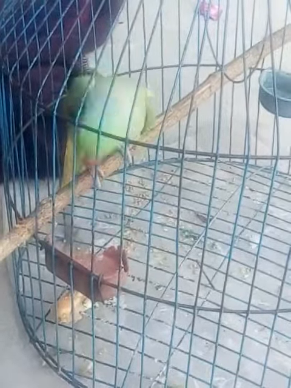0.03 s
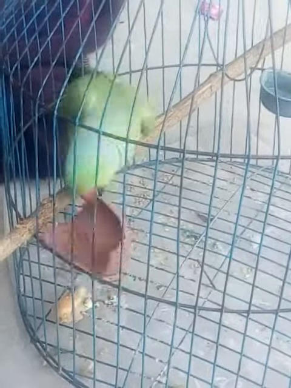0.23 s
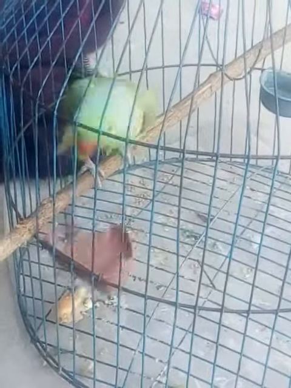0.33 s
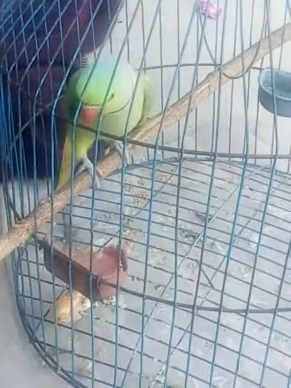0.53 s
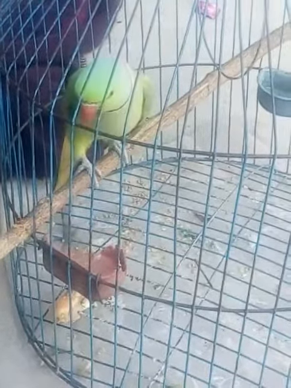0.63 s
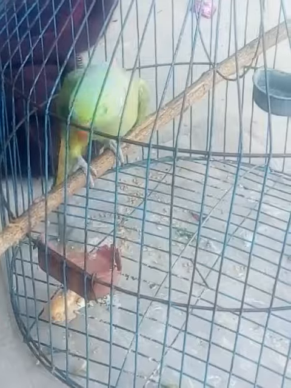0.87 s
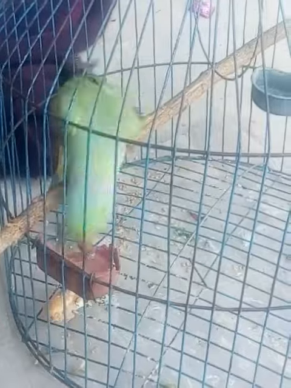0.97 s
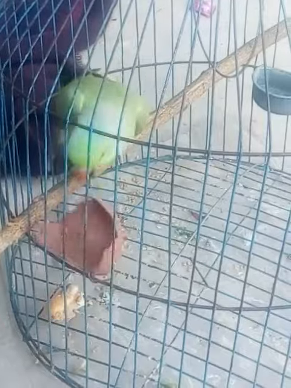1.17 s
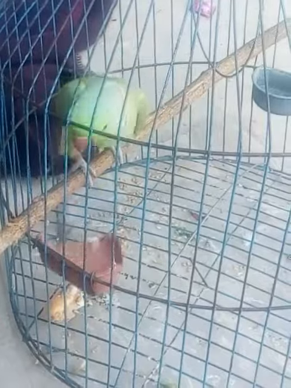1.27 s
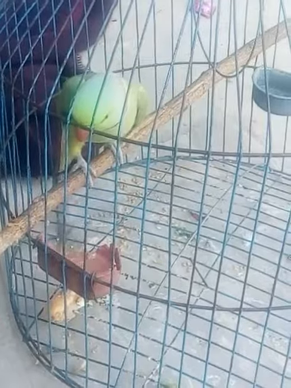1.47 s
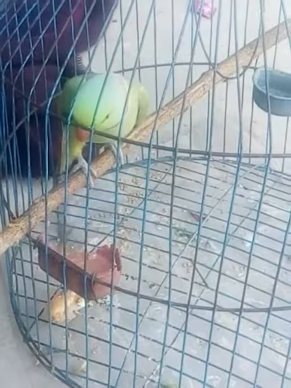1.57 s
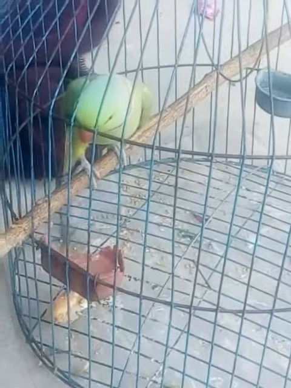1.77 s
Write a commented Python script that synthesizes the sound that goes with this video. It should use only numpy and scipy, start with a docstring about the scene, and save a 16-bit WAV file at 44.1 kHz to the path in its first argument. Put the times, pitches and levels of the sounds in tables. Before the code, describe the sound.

A parrot gives two harsh rasping squawks close by, with light plastic knocks and faint rustling

```python
"""At a cage, close to the microphones: a parrot gives two rasping squawks, lunging at a plastic tub.
Its syrinx sounds in short bursts, about 125 a second, each a rising buzz with throat rings and breath.
The knocked tub and its ticks are ringing modes; the rustle of seeds and claws is grainy noise.
Far behind: a horn and steady tones built of sines, a bird chirping as a blurred falling trill,
and a low rumble with air, which is coloured noise."""
import sys
import numpy as np
from scipy import signal
from scipy.fft import rfft, irfft
from scipy.io import wavfile

SR = 44100
rng = np.random.default_rng(int(sys.argv[2]) if len(sys.argv) > 2 else 0)


def ratio_of_db(decibels):
    """Turn decibels (scalar or array-like) into linear amplitude factors; 0 dB maps to 1."""
    return 10 ** (np.asarray(decibels, float) / 20)


def output_pcm(signal):
    """Save a mono or channel-first signal as 16-bit PCM at the path in sys.argv[1].

    Samples are clipped to [-1, 1] before scaling.
    """
    pcm = np.clip(np.atleast_2d(signal).T, -1, 1) * 32767
    wavfile.write(sys.argv[1], SR, np.round(pcm).astype(np.int16))


N = 79380   # samples, 1.8 s
EARS = np.array([[1], [-1]])   # left, right


def rms_one(x):
    """Scales a sound to an rms of 1."""
    return x / np.sqrt(np.mean(x ** 2) + 1e-20)


def in_time(rows):
    """Reads table columns at every sample; the second (dB) is silent outside the table."""
    s, db, *rest = np.transpose(rows)
    t = np.arange(N) / SR
    level_db = np.interp(t, s, db, -200, -200)
    return [level_db] + [np.interp(t, s, column) for column in rest]


def at_hz(points, hz):
    """Reads a table of (Hz, value) along a logarithmic frequency scale."""
    p = np.array(points)
    return np.interp(np.log(hz + 1), np.log(p[:, 0] + 1), p[:, 1])


def colour(x, points, share=1):
    """Filters by a share of a table of (Hz, dB)."""
    gain_db = share * at_hz(points, np.fft.rfftfreq(N, 1 / SR))
    return irfft(rfft(x) * ratio_of_db(gain_db), N)


def drift(rate_hz):
    """Slow random wandering with a spread of 1, drawn every 40 samples."""
    r = np.exp(-80 * np.pi * rate_hz / SR)
    noise = rng.standard_normal(N // 40 + 2002)
    slow = signal.lfilter([1], [1, -2 * r, r * r], noise)[2000:]
    return np.interp(np.arange(N) / 40, np.arange(len(slow)), rms_one(slow))


def squawk(rows, first_burst_s):
    """Bursts of the syrinx drive a buzz and three throat rings; breath noise passes the same gate."""
    # Breath noise colour. Each row: frequency in Hz, relative level in dB per Hz.
    throat = [(290, -44), (500, -17), (950, -2), (1290, -13), (1900, -2), (2400, -2), (3190, -4.5),
              (4400, -4.5), (5500, -11), (7130, -15.5), (8300, -35.5), (10500, -37), (15500, -47)]
    # Throat and beak resonances. Each row: frequency in Hz, gain in dB.
    beak = [(300, -18), (700, -6), (960, 1), (1300, 2.5), (2200, -6), (2850, -0.5), (3700, -7),
            (4400, -3.5), (5400, 6), (6400, -3.5), (7400, -42), (8500, 0), (12000, -12.5)]
    # Nasal ring. Each row: time in seconds, relative level in dB.
    nasal = [(.17, -8), (.228, -3.5), (.292, -4), (.33, -19), (.6, -35), (1.045, -2.5), (1.136, -4),
             (1.19, -2.5), (1.23, -40), (1.42, -53), (1.47, -11), (1.56, -9)]
    # Relative levels of the buzz partials 4 and up, in dB.
    upper_partials = [-27, -17.5, -54, -58, -49, -64, -33.5]
    rise_s, fall_s = 0.0017, 0.0014   # shape of a burst
    jitter_s, spread_db, pitch_spread = .00006, .6, .004   # chance from burst to burst
    nasal_hz = 1554
    high_ring_rise = .08   # share of its pitch that the high ring sweeps in a burst
    slip_rad, scatter_rad = 1.3, .3   # phase: slip at each burst, offset between the ears
    breath_alike = 0.21   # likeness of the breath in the two ears
    between_db, breath_db = -10, -9   # breath let through between bursts, breath against buzz

    db, rate, low_hz, low_db, hz, rise, p2, p3, high_hz, high_db = in_time(rows)
    turns = np.cumsum(rate) / SR
    turns -= turns[int(first_burst_s * SR)]
    burst = np.round(turns).astype(int)
    luck = rng.standard_normal((400, 27))[burst % 400]
    u = (turns - burst) / rate + jitter_s * luck[:, 0]   # seconds from the burst's peak
    gate = np.exp(-.5 * (u / np.where(u < 0, rise_s, fall_s)) ** 2)
    gate = gate * ratio_of_db(spread_db * luck[:, 1])

    # The membranes run on between bursts and slip a little each time.
    turn = 2 * np.pi * (1 + pitch_spread * luck[:, 2])
    slip = slip_rad * np.cumsum(rng.standard_normal((400, 4)), axis=0)[burst % 400].T

    def run_on(f):
        return 2 * np.pi * np.cumsum(f) / SR + (turn - 2 * np.pi) * f * u

    def sweep_up(f, share):
        return turn * f * share * u * u / (4 * rise_s)

    buzz_phase = run_on(hz) + slip[0] / 4 + sweep_up(hz, rise)
    high_phase = run_on(high_hz) + slip[2] + sweep_up(high_hz, high_ring_rise)
    parts = [(low_db, run_on(low_hz) + slip[1]),
             (high_db, high_phase),
             (in_time(nasal)[0], run_on(nasal_hz + 0 * u) + slip[3])]
    for j, partial_db in enumerate([p2, p3, *upper_partials]):
        parts.append((partial_db, (j + 2) * buzz_phase))
    voice = np.zeros((2, N))
    for j, (part_db, angle) in enumerate(parts):
        strength = ratio_of_db(part_db + spread_db * luck[:, 3 + j])
        voice += strength * np.cos(angle + EARS * scatter_rad * luck[:, 15 + j])

    mid, side = rng.standard_normal((2, N))
    air = np.sqrt(1 + breath_alike) * mid + np.sqrt(1 - breath_alike) * side * EARS
    breath = ratio_of_db(breath_db) * rms_one(colour(air, throat))
    level = ratio_of_db(db)
    return colour(level * gate * np.sqrt(2) * voice, beak) + level * (gate + ratio_of_db(between_db)) * breath


def parrot():
    """The two squawks, each with its own course of burst rate, pitch and rings."""
    # One table a squawk. Each row: time in seconds, relative level in dB, bursts per second,
    # low ring in Hz and dB, buzz pitch in Hz, its rise in a burst as a share,
    # partials 2 and 3 in dB, high ring in Hz and dB.
    squawk_tables = [
        [(.17, -70, 141, 1000, -18, 992.3, 0.23, -24, 1, 4750, -12),
         (.178, -41.5, 142.3, 1068, -9.5, 1050, 0.45, -0.5, -8, 4640, -11.5),
         (.228, -33, 143.5, 1030, -20, 999, 0.25, -4, 4, 4750, -6),
         (.292, -32.5, 138, 990, -19, 1311, 0.2, 3, -9, 4320, -18),
         (.315, -31.5, 132.2, 899.7, -10.5, 1227, 0.33, 5.5, -7, 4300, -4.5),
         (.374, -26.5, 133.2, 974, -11, 1178, 0.21, 4, 2, 4450, 5.5),
         (.414, -28.5, 122.2, 920, -10, 1008, 0.12, -2, -4.5, 4300, 4.5),
         (.476, -22.5, 117.8, 930.4, -16, 1001, 0.17, -14.5, -5.5, 4560, -11.5),
         (.542, -37.5, 117.5, 839, -4.5, 913, 0.16, -4, -10.5, 4370, -7.5),
         (.63, -55, 121.8, 888, -6, 875, 0.87, -6, -30, 4450, -4)],
        [(1.035, -69.5, 150.5, 863.8, -12, 1327, 0.066, -5, -18, 4500, -27),
         (1.094, -29.5, 143, 860, -15, 1458, 0.28, 4, -31, 4650, -4.5),
         (1.136, -35.5, 133.6, 841.4, -15, 1342, 0.12, -4.5, -23, 4300, -33),
         (1.164, -33, 129.2, 825.2, -9.5, 1303, 0.26, 8.5, -18, 4280, -16),
         (1.224, -30.5, 125.3, 886, -5, 1110, 0.28, 4, 0.5, 4190, 6),
         (1.278, -26.5, 122.3, 950, -16, 1046, 0.23, -2, -5, 4320, 6),
         (1.34, -21, 112.6, 1020, -20, 1048, 0.13, -14, -2.5, 4400, -12.5),
         (1.431, -30.5, 105.7, 1090, -9.5, 1092, 0.13, 5, 4.5, 4300, -4.5),
         (1.434, -29.5, 103, 1183, -13.5, 1367, 0.086, 3.5, -1, 4600, -2),
         (1.486, -32.5, 107.5, 1150, -20.5, 1501, 0.15, 0, -10, 4600, -9),
         (1.56, -55, 114, 1118, -2, 1434, 0.055, -13, -29, 4500, -40)],
    ]
    # Time in seconds on which a burst of each squawk is centred.
    first_bursts = [.1775, 1.0625]
    return ratio_of_db(6.5) * sum(squawk(rows, s) for rows, s in zip(squawk_tables, first_bursts))


def strike(hits, modes):
    """Each hit sets every mode ringing, with a strength of its own, to die away exponentially."""
    out = np.zeros(N)
    s, db = np.transpose(hits)
    for hz, level_db, t60 in modes:
        clicks = np.full(N, 1e-18)
        clicks[(s * SR).astype(int)] = ratio_of_db(db + level_db + rng.normal(0, 0.27, len(s)))
        r = ratio_of_db(-60 / (t60 * SR))
        w = 2 * np.pi * hz / SR
        out += signal.lfilter([0, np.sin(w)], [1, -2 * r * np.cos(w), r * r], clicks)
    return out


def tub_knocks():
    """The beak knocks the plastic tub, whose modes ring; the bass is cut."""
    # Knocks. Each row: time in seconds, relative level in dB.
    knocks = [(.2205, -28), (1.0945, -19.5)]
    # Modes of the tub. Each row: frequency in Hz, relative level in dB, t60 in seconds.
    tub_modes = [(605, -11.5, 0.22), (880, 0.5, 0.016), (1226, 9, 0.013), (1740, -2, 0.11),
                 (2660, -20, 0.027), (4600, -16, 0.029), (9800, -24, 0.011)]
    high_pass = signal.butter(4, 600, "high", fs=SR, output="sos")
    return ratio_of_db(-4.5) * signal.sosfilt(high_pass, strike(knocks, tub_modes))


def tub_ticks():
    """The tub settles on the wire with small, quickly damped ticks."""
    # Ticks. Each row: time in seconds, relative level in dB.
    ticks = [(.569, -34), (.629, -41), (.689, -50)]
    # Modes of a tick. Each row: frequency in Hz, relative level in dB, t60 in seconds.
    tick_modes = [(3100, 0, .014), (4300, -8, .006), (5400, -8, .006), (6600, -6, .008), (8500, -25, .005)]
    return strike(ticks, tick_modes)


def rustle():
    """Seeds and claws shifting: fine dry grains, noise of unsteady level in a band."""
    # Each row: time in seconds, relative level in dB.
    rustle_levels = [(.5, -55), (.58, -56.5), (.7, -59), (.82, -89), (1.45, -77), (1.56, -61), (1.8, -83)]
    grains = rng.standard_normal((2, N)) * ratio_of_db(2.5 * drift(90))
    band = signal.butter(4, [1000, 7000], "band", fs=SR, output="sos")
    return ratio_of_db(in_time(rustle_levels)[0]) * rms_one(signal.sosfilt(band, grains))


def space(x):
    """Direct sound late on the left, sparse near echoes and a dull dying tail, all shaded by ear."""
    # Near sources. Each row: frequency in Hz, left minus right in dB.
    shadow = [(300, 2), (640, 0.5), (1410, 0), (2400, -6.5), (4400, -6), (8000, -3.5), (15000, -3)]
    early_db, tail_db, tail_t60_s, wall_cut_hz = -14, -19, .35, 4000
    left_lag_s = .0001
    t = np.arange(int(.5 * SR)) / SR
    sparse = rng.random((2, len(t))) < .02
    early = rng.standard_normal((2, len(t))) * sparse * np.exp(-t / 0.012) * (t > .0008)
    low_pass = signal.butter(1, wall_cut_hz, fs=SR, output="sos")
    tail = signal.sosfilt(low_pass, rng.standard_normal((2, len(t))))
    tail *= ratio_of_db(-60 * t / tail_t60_s) * (t > .008)

    def unit_energy(v):
        return v / np.sqrt(np.sum(v ** 2, axis=1, keepdims=True))

    echoes = ratio_of_db(early_db) * unit_energy(early) + ratio_of_db(tail_db) * unit_energy(tail)
    wet = signal.fftconvolve(x, echoes, axes=1)[:, :N]
    delay = np.exp(-2j * np.pi * np.fft.rfftfreq(N, 1 / SR) * left_lag_s)
    late = irfft(rfft(x[0]) * delay, N)
    return np.array([colour(late + wet[0], shadow, .5), colour(x[1] + wet[1], shadow, -.5)])


def horn():
    """Far horn: partials that slide up into place and waver with the air."""
    # Each row: time in seconds, relative level in dB, pitch as a share.
    horn_course = [(.735, -85, .94), (.755, -57, .94), (.8, -52, 1), (.825, -66, 1), (.86, -62, 1),
                   (.885, -64, 1), (.9, -80, 1)]
    # Partials. Each row: frequency in Hz at a pitch share of 1, relative level in dB.
    horn_lines = [(1385, 0), (1510, -8)]
    db, share = in_time(horn_course)
    t = np.cumsum(share) / SR   # time bent by the pitch
    out = np.zeros(N)
    for hz, line_db in horn_lines:
        out += ratio_of_db(line_db + drift(10)) * np.sin(2 * np.pi * hz * t + .6 * drift(20))
    return ratio_of_db(db) * out


def far_tones():
    """Faint steady sines, each of which swells, holds and fades."""
    # Each row: start in seconds, end in seconds, frequency in Hz, peak level in dB.
    tones = [(.79, .89, 2261, -68), (.81, .88, 2710, -70), (.78, .9, 3161, -69), (1.555, 1.62, 720, -55),
             (1.62, 1.695, 985, -59)]
    t = np.arange(N) / SR
    out = np.zeros(N)
    for start, end, hz, db in tones:
        along = np.clip((t - start) / (end - start), 0, 1)
        swell = np.sqrt(np.sin(np.pi * along) + 1e-18)
        out += ratio_of_db(db) * swell * np.sin(2 * np.pi * hz * t)
    return out


def chirp():
    """Far bird: a falling trill, a gliding sine blurred by slow noise of its own in each ear."""
    # Each row: time in seconds, level in dB, pitch in Hz.
    trill = [(1.64, -61, 4350), (1.67, -56.5, 4270), (1.72, -56.5, 3840), (1.75, -59.5, 3600),
             (1.8, -59.5, 3730)]
    db, hz = in_time(trill)
    low_pass = signal.butter(2, 600, fs=SR, output="sos")
    blur = rms_one(signal.sosfilt(low_pass, rng.standard_normal((2, N))))
    return ratio_of_db(db) * blur * np.sqrt(2) * np.sin(2 * np.pi * np.cumsum(hz) / SR)


def background():
    """Rumble and air: coloured noise, most alike in the two ears in the bass."""
    # Each row: frequency in Hz, likeness of the two ears from 0 to 1.
    likeness = [(30, 0.81), (60, 0.97), (180, 0.97), (350, 0.82), (550, 0.54), (1650, 0), (15000, 0.1)]
    # Each row: frequency in Hz, left minus right in dB.
    back_pan = [(60, 0), (240, 2.5), (950, 0), (3770, -4.5), (15000, -2)]
    # Spectrum. Each row: frequency in Hz, relative level in dB per Hz.
    back_colour = [(15, -23), (33, -39), (42, 4), (50, 2), (62, -19), (80, -9.5), (100, 2), (133, 3),
                   (215, -6.5), (320, -8), (400, -14), (523, -12), (684, -16.5), (919, -19), (1750, -25),
                   (2300, -31), (3500, -34), (5140, -34), (6800, -41), (8000, -69), (15500, -51.5)]
    # Each row: time in seconds, change of level in dB.
    back_swell = [(0, -1.5), (.3, 3.5), (.65, 2), (.9, 1), (1.2, 2.5), (1.6, 1.5), (1.8, 1)]
    mid, side = rfft(rng.standard_normal((2, N)))
    hz = np.fft.rfftfreq(N, 1 / SR)
    alike = at_hz(likeness, hz)
    noise = np.sqrt(1 + alike) * mid + np.sqrt(1 - alike) * side * EARS
    gain_db = at_hz(back_colour, hz) + at_hz(back_pan, hz) / 2 * EARS
    out = rms_one(irfft(noise * ratio_of_db(gain_db), N))
    swell_db = np.interp(np.arange(N) / SR, *np.transpose(back_swell))
    return ratio_of_db(-48.5 + swell_db) * out


def scene():
    """Bird and tub near the microphones, the rest far."""
    near = parrot() + tub_knocks() + tub_ticks() + rustle()
    return space(near) + horn() + far_tones() + chirp() + background()


def top_cut(x):
    """Nothing passes above the cut-off."""
    return signal.sosfilt(signal.butter(12, 15710, fs=SR, output="sos"), x)


def record(dry):
    """Takes down the finished mix."""
    return top_cut(dry)


dry = scene()
out = record(dry)
output_pcm(out)
```